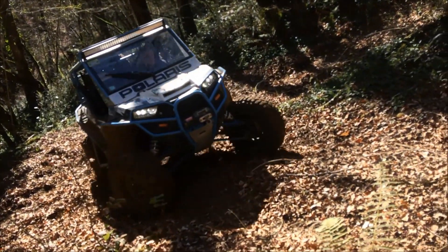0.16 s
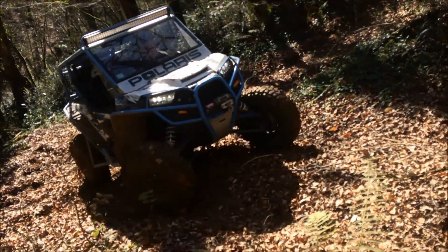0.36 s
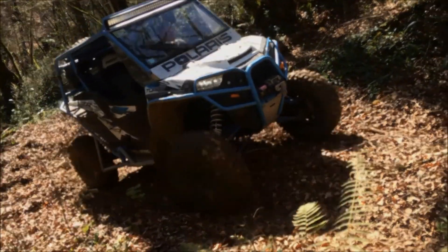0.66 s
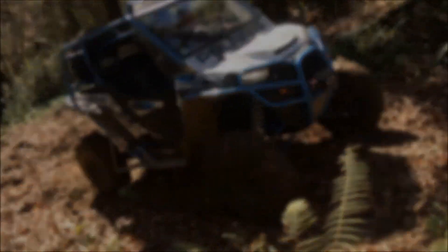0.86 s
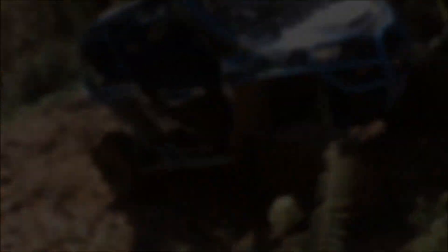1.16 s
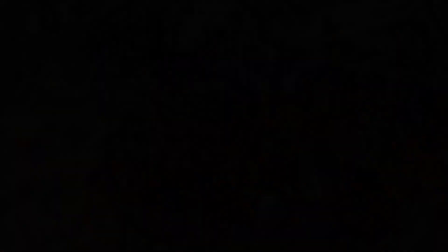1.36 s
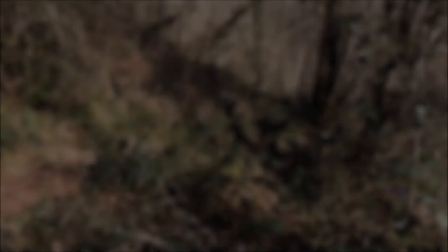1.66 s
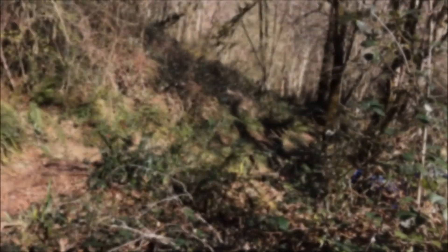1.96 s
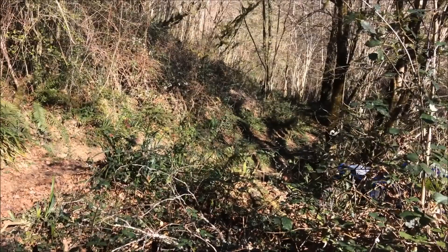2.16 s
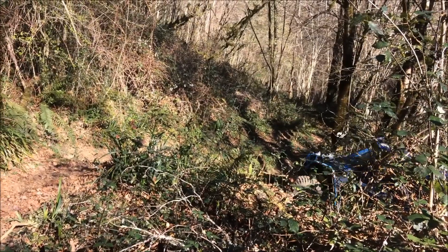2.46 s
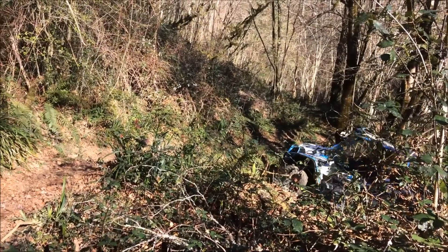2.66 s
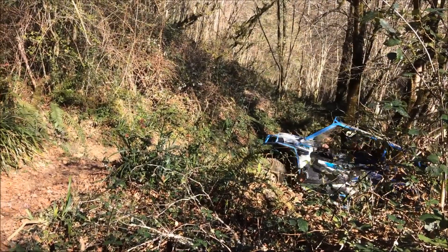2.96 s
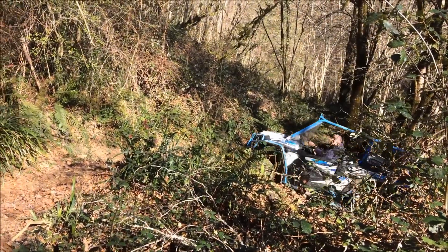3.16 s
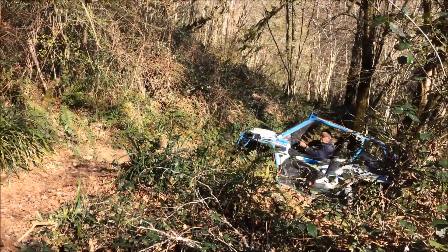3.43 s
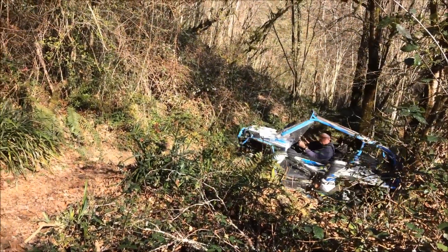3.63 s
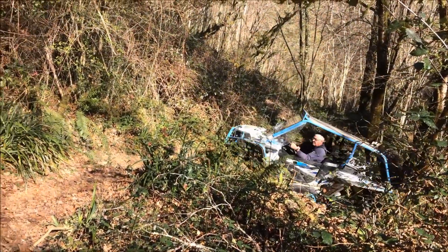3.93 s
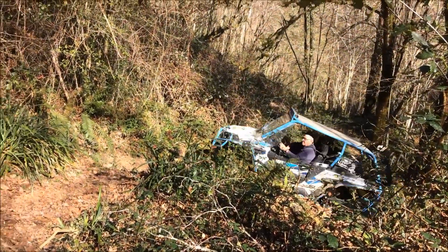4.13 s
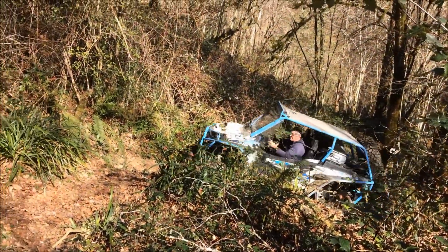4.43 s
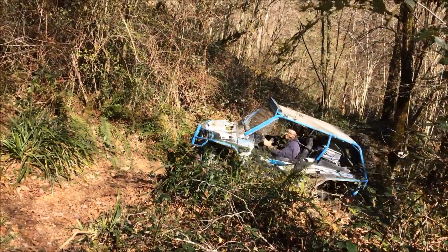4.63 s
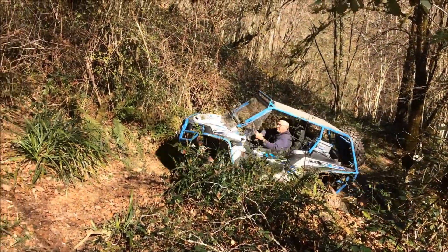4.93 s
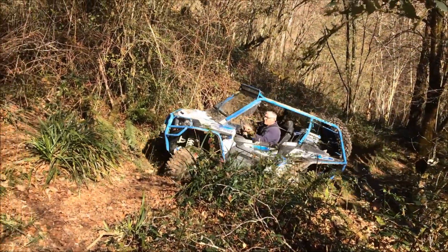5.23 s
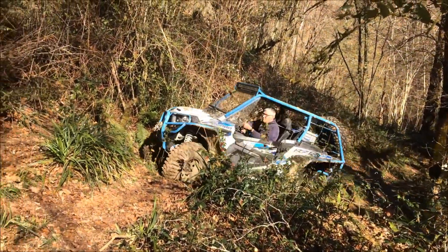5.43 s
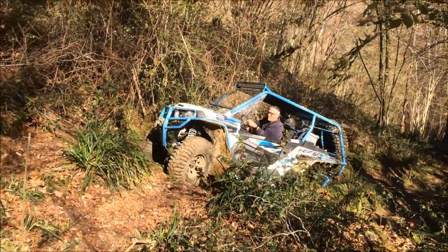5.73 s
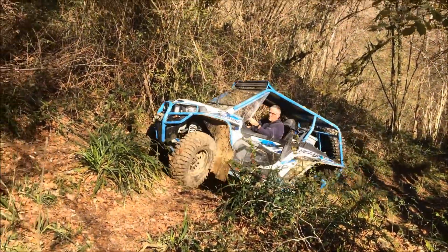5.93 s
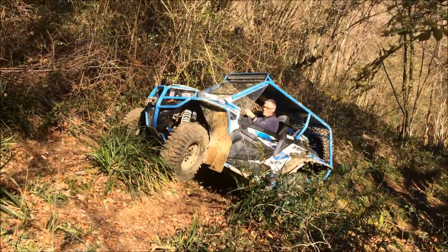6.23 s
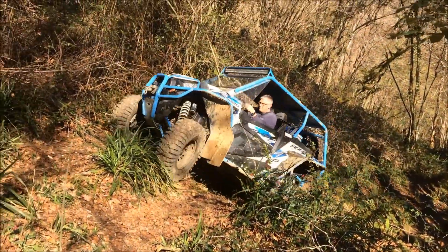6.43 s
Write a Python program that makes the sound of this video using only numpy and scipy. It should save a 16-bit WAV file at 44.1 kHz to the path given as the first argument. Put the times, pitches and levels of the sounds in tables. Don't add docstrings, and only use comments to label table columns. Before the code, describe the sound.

A twin-cylinder off-road buggy growls close by over crunching leaves, then abruptly a farther one bogs down and pulls again up the forest slope.

```python
import sys
import numpy as np
from scipy import signal
from scipy.fft import rfft, irfft, next_fast_len
from scipy.io import wavfile
from scipy.ndimage import uniform_filter1d

SR = 44100
rng = np.random.default_rng(int(sys.argv[2]) if len(sys.argv) > 2 else 0)


def inscribe(sig):
    pcm = np.round(np.clip(np.atleast_2d(sig).T, -1, 1) * 32767)
    wavfile.write(sys.argv[1], SR, pcm.astype(np.int16))


def voltage_ratio(level):
    return 10 ** (np.asarray(level, float) / 20)


N = 290619
TIME_S = np.arange(N) / SR
CUT_S, FAR_START_S = 2.118, .665
MEAN_CYCLE_HZ = 34.8
ECHO_CHANGE_HZ = 1.08


def in_time(rows):
    s, *columns = np.transpose(rows)
    return [np.interp(TIME_S, s, c) for c in columns]


def rms_one(x):
    return x / np.sqrt(np.mean(x ** 2) + 1e-20)


def drift(rate_hz):
    r = np.exp(-2 * np.pi * rate_hz * 40 / SR)
    noise = rng.standard_normal(N // 40 + 2002)
    slow = signal.lfilter([1], [1, -2 * r, r * r], noise)[2000:]
    return np.interp(np.arange(N) / 40, np.arange(len(slow)), rms_one(slow))


def swells(rows):
    total_db = 0
    for s, db, rise_s, fall_s in rows:
        rise = np.exp(-((TIME_S - s) / rise_s) ** 2)
        fall = np.exp((s - TIME_S) / fall_s)
        total_db = total_db + db * np.where(TIME_S < s, rise, fall)
    return total_db


def coloured(source, spectrum):
    size = next_fast_len(N + SR // 4)
    hz, level_db = np.transpose(spectrum)
    bin_hz = np.arange(size // 2 + 1) * SR / size
    log_gain = np.log(voltage_ratio(np.interp(np.log(bin_hz + 1), np.log(hz), level_db)))
    cepstrum = irfft(log_gain, size)
    cepstrum[1:size // 2] *= 2
    cepstrum[size // 2 + 1:] = 0
    return rms_one(irfft(rfft(source, size) * np.exp(rfft(cepstrum)), size)[:N])


def firings(turns, pipe, second_db, scatter_db, jitter_s):
    cycles = np.arange(np.ceil(turns[0]), turns[-1] - 1)
    chance = rng.standard_normal((2, 400, 2))[:, :len(cycles)]
    pulses = np.zeros(N + 2)
    for offset, level_db, luck in zip((0, 3 / 8), (0, second_db), chance):
        at = np.interp(cycles + offset, turns, np.arange(N)) + jitter_s * SR * luck[:, 0]
        at = np.clip(at, 0, N)
        size = voltage_ratio(level_db + scatter_db * luck[:, 1])
        whole = at.astype(int)
        pulses[whole] += size * (1 - at % 1)
        pulses[whole + 1] += size * (at % 1)
    return coloured(pulses[:N], pipe)


def scattered(x, t60):
    t = np.arange(SR // 5) / SR
    echoes = rng.standard_normal((4, len(t))) * voltage_ratio(-60 * t / t60)
    weights = np.array([drift(ECHO_CHANGE_HZ) for _ in echoes])
    weights = weights / np.sqrt(np.sum(weights ** 2, axis=0))
    return rms_one(sum(w * signal.fftconvolve(x, e)[:N] for w, e in zip(weights, echoes)))


def exhaust(rows, orders, silencer, pipe, rasp_db, start_turns, lead, bend, second_db):
    cycle_hz, level_db, lope_db = in_time(rows)
    cycle_hz = uniform_filter1d(cycle_hz, size=SR // 20)
    turns = start_turns + np.cumsum(cycle_hz) / SR
    overrun = np.clip(-np.gradient(cycle_hz) * SR / 42, 0, 1)
    speed_db = 0.48 * (cycle_hz - MEAN_CYCLE_HZ)
    stumble_db = -24 * np.exp(-((TIME_S - 3.285) / 0.04) ** 2)
    hz, silencer_db = np.transpose(silencer)
    drone = 0
    for k, order_db, share, overrun_db in orders:
        db = order_db + level_db + share * lope_db + overrun_db * overrun
        db = db + 1.5 * drift(9)
        db = db + (k > 6) * 1.86 * drift(ECHO_CHANGE_HZ)
        db = db + ((k > 3) - 0.42 * (k == 3)) * stumble_db
        db = db + (k > 8) * speed_db
        db = db + np.interp(np.log(k * cycle_hz), np.log(hz), silencer_db)
        phase = k * turns + lead + bend * k * k
        drone = drone + np.sqrt(2) * voltage_ratio(db) * np.sin(2 * np.pi * phase)
    load_db = uniform_filter1d(level_db + np.maximum(lope_db, 0), size=SR // 8)
    pulses = firings(turns, pipe, second_db, scatter_db=.8, jitter_s=.00002)
    rasp = voltage_ratio(load_db + rasp_db + speed_db) * scattered(pulses, t60=.09)
    return drone + rasp, turns, cycle_hz


# start_s, cycle_hz, level_db, lope_db
NEAR_RUN = [(0.0, 40.43, -20.5, -5.5), (.13, 38.9, -20.5, 0.5), (.35, 42.2, -21.5, 0.5),
            (.5, 43.72, -26.5, 8), (.65, 43.08, -26.5, 5.5), (.89, 41.23, -23.5, 3),
            (1.14, 40.72, -23, 1.5), (1.39, 42.21, -22.5, 5.5), (1.65, 40.85, -20.5, 3),
            (1.88, 42.14, -18, 1), (2.13, 40.87, -17, 0)]
# multiple, level_db, lope_share, overrun_gain_db
NEAR_ORDERS = [(1, -14, 1.7, -15), (2, -0.8, 1.18, 2), (3, -8, 1.67, -5), (4, -11.5, 1.1, -11),
               (5, 0.44, -0.0042, -2), (6, -11.5, 0.58, -2), (8, -16, 0.76, -23), (10, -23.5, 0.86, -8),
               (11, -20.5, .4, -30), (15, -24, -0.47, -14)]
# pitch_hz, level_db (per Hz)
NEAR_PIPE = [(200, -56), (270, 3), (330, 5.5), (380, 5), (430, -4.5), (500, -2.5), (620, -6), (750, -7),
             (900, -6), (1200, -12.5), (1800, -9), (2600, -40)]


def near_exhaust():
    open_pipe = [(20, 0), (400, 0)]
    return exhaust(NEAR_RUN, NEAR_ORDERS, open_pipe, NEAR_PIPE, rasp_db=-17,
                   start_turns=0.05, lead=0.089, bend=0.038, second_db=1)


# start_s, cycle_hz, level_db, lope_db
FAR_UNDER = [(.665, 37.4, -28, 11), (.9, 35.48, -22.5, -17), (1.2, 35.63, -23.5, -1), (1.35, 37.8, -26, -3),
             (1.5, 38.29, -28.5, 11), (1.62, 37.6, -22, -25), (1.8, 34.05, -26, 0), (1.95, 33.46, -18, -14),
             (2.08, 35.67, -24, -2)]
# start_s, cycle_hz, level_db, lope_db
FAR_ALONE = [(2.15, 36.92, -22.5, -1), (2.6, 37.35, -23, -0.5), (2.889, 37.67, -25.5, 2.5),
             (3.0, 33.45, -26.5, 3.5), (3.229, 26.17, -24.5, 1.5), (3.421, 21.98, -21, -5.5),
             (3.58, 25.79, -20.5, -4.5), (3.72, 29.16, -23.5, 0.5), (3.86, 29.8, -21, -8),
             (4.02, 28.5, -26, -1), (4.199, 27.25, -23, -4.5), (4.499, 30.43, -20, -5),
             (4.68, 33.61, -24, -2.5), (5.119, 33.14, -30, 10), (5.33, 31.53, -30, 10),
             (5.66, 32.2, -22.5, -1), (5.989, 34.31, -23, -4), (6.59, 35.6, -19, -10.5)]
# multiple, level_db, lope_share, overrun_gain_db
FAR_ORDERS = [(1, -38, .4, 0.1), (2, 0.1, 0.78, -8.5), (3, -15.5, 0.72, 14.5), (4, -12, 0.98, -4),
              (5, 2.1, 0.01, -1.5), (6, -3.5, 0.076, -5), (7, -16.5, .1, -9), (8, -8.5, 0.4, -8),
              (11, -17, 0.36, -10), (13, -12, .6, -13), (14, -20.5, 0.7, -15), (16, -13, 0.57, -17),
              (24, -15, .5, -12)]
# pitch_hz, gain_db
SILENCER = [(45, -5.5), (62, 0), (165, 0.1), (195, -3.5), (225, -14), (300, -16.5), (480, -7), (600, -15)]
# pitch_hz, level_db (per Hz)
FAR_PIPE = [(130, -40.5), (190, 6.5), (230, -22), (290, 0.5), (340, -16), (400, -3.5), (480, 1), (560, -4),
            (680, -14), (860, -12.5), (1100, -12.5), (1600, -16.5), (2300, -52.5)]


def far_exhaust():
    return exhaust([*FAR_UNDER, *FAR_ALONE], FAR_ORDERS, SILENCER, FAR_PIPE, rasp_db=-16.5,
                   start_turns=.6, lead=0.031, bend=0.021, second_db=-8)


def clatter(turns, spectrum, gate, patchy_db):
    swell = 1 + gate * (np.cos(4 * np.pi * turns) + 0.75 * np.cos(2 * np.pi * turns))
    return coloured(rng.standard_normal(N) * swell * voltage_ratio(patchy_db * drift(20)), spectrum)


# pitch_hz, level_db (per Hz)
WHISTLE = [(2300, -43), (2650, 2.5), (2850, 8), (3130, 4.5), (3350, 7.5), (3800, 1.5), (4400, -46)]


def whistle(level_db, turns):
    return voltage_ratio(level_db + 0.69 * drift(13)) * clatter(turns, WHISTLE, gate=0.18, patchy_db=0.8)


# pitch_hz, width_hz, level_db
PANELS = [(607.7, 17, -3), (829, 10, 1), (1326, 12.93, 5), (1550, 25.6, -2), (1800, 22.9, -23),
          (2156, 30, 4), (3150, 60, 2)]


def panels(x):
    out = x.copy()
    for hz, width_hz, level_db in PANELS:
        r = np.exp(-np.pi * width_hz / SR)
        poles = [1, -2 * r * np.cos(2 * np.pi * hz / SR), r * r]
        out += voltage_ratio(level_db) * signal.lfilter([(1 - r * r) / 2, 0, (r * r - 1) / 2], poles, x)
    return out


def leaves(spectrum, per_s, spread_db, grain_share):
    sizes = voltage_ratio(spread_db * np.minimum(rng.exponential(1, N), 5)) * rng.choice([-1, 1], N)
    crackle = sizes * (rng.random(N) < per_s * voltage_ratio(5 * drift(12)) / SR)
    hiss = rng.standard_normal(N) * voltage_ratio(0.77 * drift(21))
    mixed = np.sqrt(grain_share) * rms_one(crackle) + np.sqrt(1 - grain_share) * hiss
    return coloured(mixed, spectrum)


# start_s, peak_db, pitch_hz, width_hz, t60_s
SNAPS = [(.41, -20, 12470, 5000, .02), (.437, -25.5, 7840, 7000, 0.051), (.666, -21.5, 6000, 9000, 0.018),
         (.885, -20, 1920, 150, 0.056), (1.619, -24, 12200, 5000, .03), (1.976, -20, 5287, 5016, 0.26),
         (3.234, -33, 610, 120, 0.06), (5.076, -33, 6862, 1993, .012), (5.131, -29, 6740, 1533, 0.01),
         (5.267, -32, 6673, 1950, 0.014), (5.352, -39, 6900, 1500, 0.022), (5.538, -29, 6500, 3500, 0.014),
         (5.752, -38, 5826, 1000, 0.017), (5.851, -31, 6900, 2010, 0.011), (6.253, -42, 6014, 5034, .015),
         (6.565, -36, 7960, 6966, 0.014)]


def snaps():
    out, t = np.zeros(N + SR), np.arange(SR // 4) / SR
    for s, peak_db, hz, width_hz, t60 in SNAPS:
        edges = np.clip([hz - width_hz / 2, hz + width_hz / 2], 100, .45 * SR)
        sos = signal.butter(2, edges, "band", fs=SR, output="sos")
        band = rms_one(signal.sosfilt(sos, rng.standard_normal(len(t))))
        envelope = voltage_ratio(peak_db - 3 - 60 * t / t60) * np.minimum(t / .001, 1)
        out[round(s * SR):][:len(t)] += envelope * band
    return out[:N]


# pitch_hz, level_db (per Hz)
RUMBLE = [(8, -59), (20, -32), (40, -4), (80, -4.5), (110, 4), (150, -9), (210, -8), (260, -28.5),
          (350, -37.5), (700, -95.5)]


def rumble(level_db):
    return voltage_ratio(level_db + 1.9 * drift(8.7)) * coloured(rng.standard_normal(N), RUMBLE)


def surroundings(approach, mix, drifts, turns, cycle_hz, clatter_colour, leaf_colour, gate, grain_share):
    (near_db,) = in_time(approach)
    mean_db = np.mean(np.transpose(approach)[1])
    leaves_db, follows, whistle_db, whistle_db_per_hz, fade_db_per_s, rumble_db = mix
    engine = voltage_ratio(near_db + 3.5) * clatter(turns, clatter_colour, gate, patchy_db=0.66)
    whistle_db = near_db + whistle_db + whistle_db_per_hz * (cycle_hz - MEAN_CYCLE_HZ)
    whistle_db = whistle_db + fade_db_per_s * (TIME_S - CUT_S)
    engine = engine + whistle(whistle_db, turns)
    leaves_db = mean_db + leaves_db + follows * (near_db - mean_db) + swells(drifts)
    litter = voltage_ratio(leaves_db) * leaves(leaf_colour, per_s=1300, spread_db=2.5, grain_share=grain_share)
    return engine, litter + rumble(rumble_db)


# start_s, level_db
NEAR_APPROACH = [(0, -38), (.45, -39.5), (1.15, -34.5), (1.35, -31), (2.12, -32)]
# leaves_db (re clatter), approach_share of the leaves, whistle_db (re clatter),
# whistle_db_per_hz (of cycle), whistle_fade_db_per_s, rumble_db
NEAR_MIX = (-3, 0.65, -20.5, -0.1, 5, -27.5)
# start_s, gain_db, rise_s, fall_s
NEAR_DRIFTS = [
    (.26, 7.5, 0.11, 0.55),
    (1.33, 2, 0.065, .3),
    (1.618, 6, 0.024, 0.083),
    (2.0, 5, 0.088, 0.36),
]
# pitch_hz, level_db (per Hz)
NEAR_CLATTER = [(200, -39), (300, -8), (420, -4.5), (600, -7), (900, -3.5), (1150, -8), (1540, -6),
                (2300, -12), (3300, -12), (6000, -25.5), (9000, -58)]
NEAR_LEAVES = [(1500, -48), (2500, -13), (4000, -2), (5700, -2.5), (9000, -3), (12900, -4.5), (15700, -8.5)]


def near_surroundings(turns, cycle_hz):
    engine, ground = surroundings(NEAR_APPROACH, NEAR_MIX, NEAR_DRIFTS, turns, cycle_hz,
                                  NEAR_CLATTER, NEAR_LEAVES, gate=0.081, grain_share=0.42)
    return engine + ground


# start_s, level_db
FAR_APPROACH = [(2.12, -42.5), (2.8, -41), (3.25, -47), (3.65, -44), (4.2, -45.5), (5.05, -42.5),
                (5.75, -43), (6.36, -40), (6.59, -39.5)]
FAR_MIX = (-6, -0.06, 0.5, 0.08, -2.5, -32)
# start_s, gain_db, rise_s, fall_s
FAR_DRIFTS = [
    (2.75, 3, .3, .4),
    (3.78, 2.58, 0.021, 0.045),
    (6.02, 4.94, 0.028, .15),
    (6.171, 5, .04, 0.081),
    (6.3, 11.7, 0.029, 0.46),
    (6.58, 4.9, 0.069, 0.11),
]
# pitch_hz, level_db (per Hz)
FAR_CLATTER = [(200, -45), (340, -11), (470, -8.5), (600, -9), (710, -10.5), (1000, -11), (1300, -12),
               (1750, -11), (2050, -16.5), (2250, -20), (2450, -16.5), (4000, -21), (6000, -32.5),
               (9000, -55)]
FAR_LEAVES = [(1500, -59), (2700, -8), (4500, -5.5), (5660, -6.5), (6400, -5.5), (9000, -8.5), (12600, -10),
              (15700, -15)]


def far_surroundings(turns, cycle_hz):
    engine, ground = surroundings(FAR_APPROACH, FAR_MIX, FAR_DRIFTS, turns, cycle_hz,
                                  FAR_CLATTER, FAR_LEAVES, gate=0.04, grain_share=0.041)
    return panels(engine) + ground


def scene():
    before_cut = np.clip((CUT_S - TIME_S) / .002, 0, 1)
    far_on = np.clip((TIME_S - FAR_START_S) / .005, 0, 1)
    near, near_turns, near_hz = near_exhaust()
    far, far_turns, far_hz = far_exhaust()
    near = near + near_surroundings(near_turns, near_hz)
    far_noise = far_surroundings(far_turns, far_hz)
    mix = before_cut * near + far_on * far + (1 - before_cut) * far_noise + snaps()
    return mix[None]


def roll_off(x):
    return signal.sosfilt(signal.butter(12, 15810, fs=SR, output="sos"), x)


def record(dry):
    return roll_off(dry)


dry = scene()
out = record(dry)
inscribe(out)
```